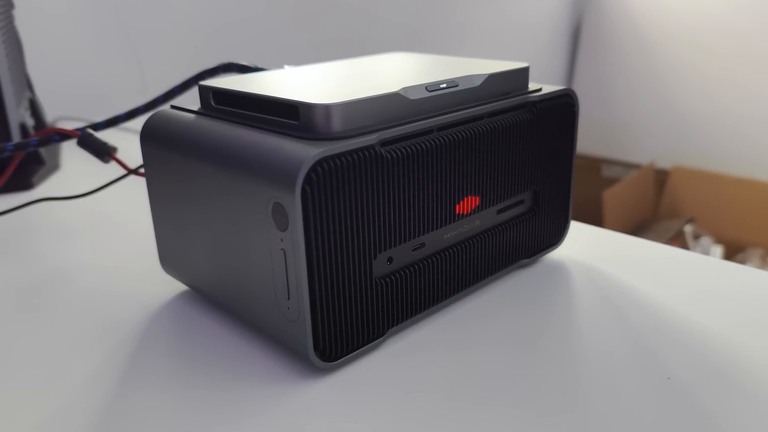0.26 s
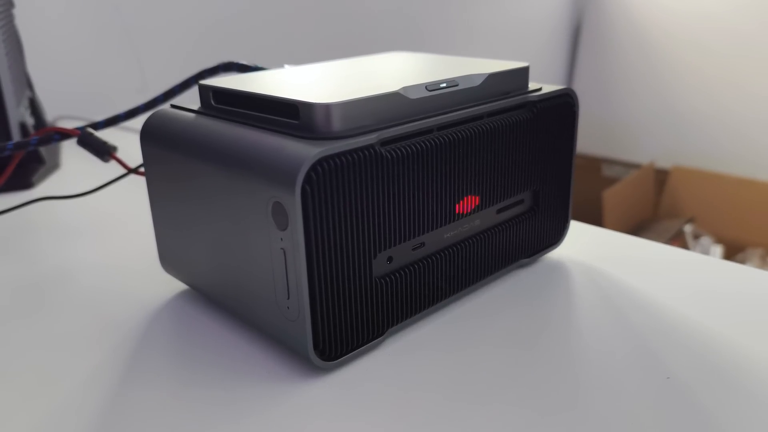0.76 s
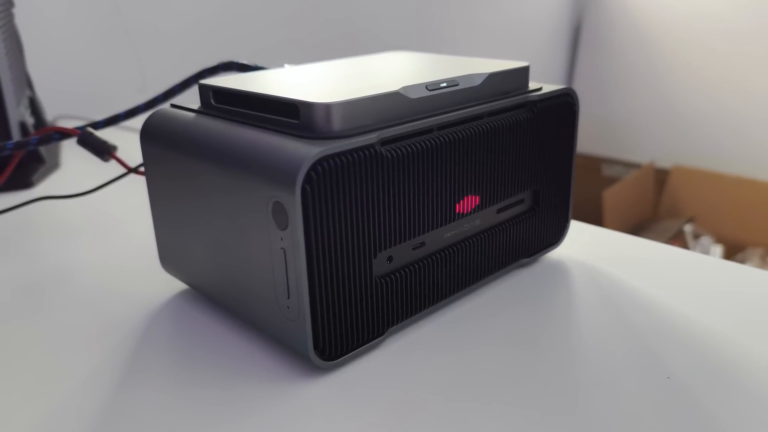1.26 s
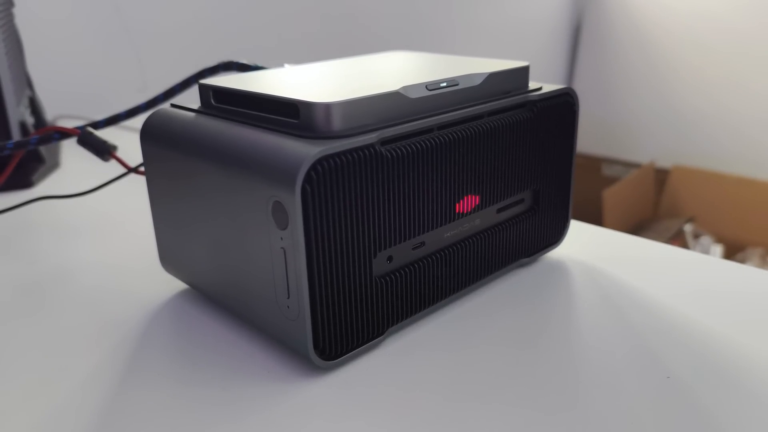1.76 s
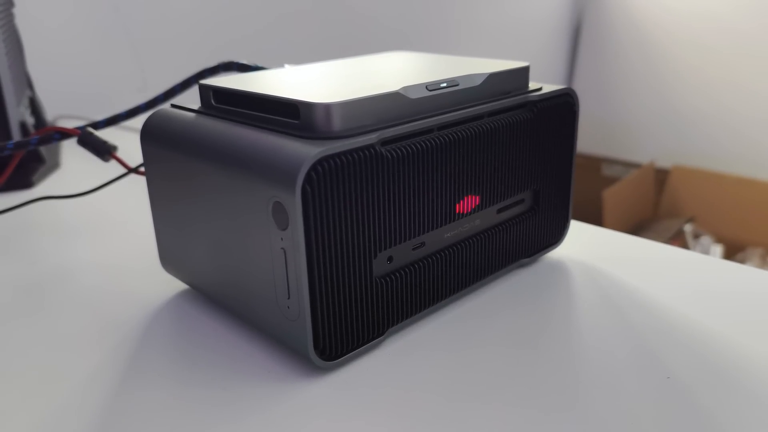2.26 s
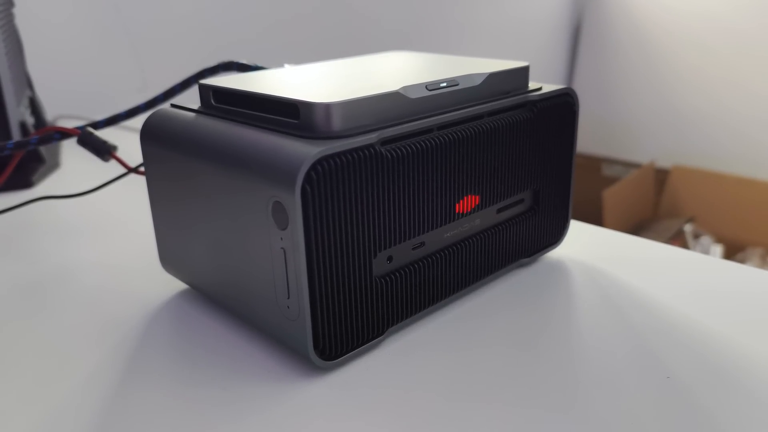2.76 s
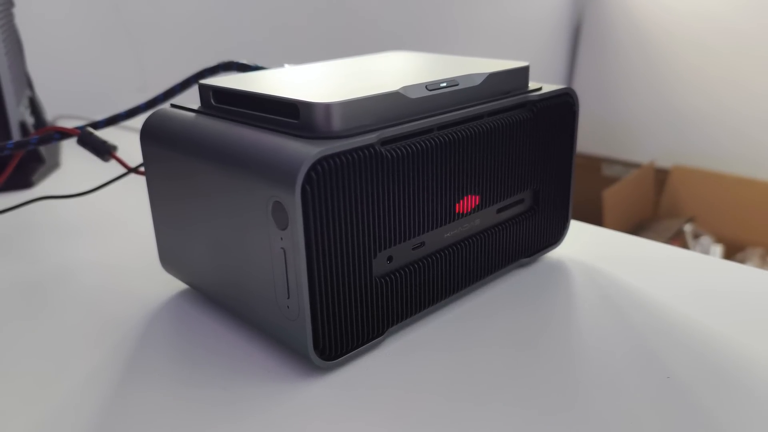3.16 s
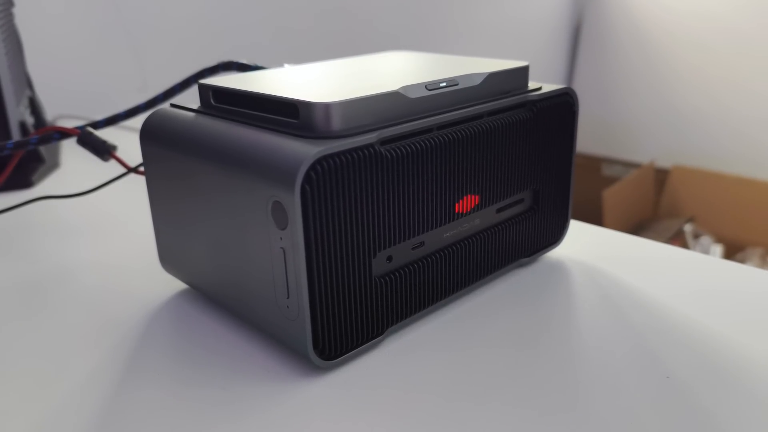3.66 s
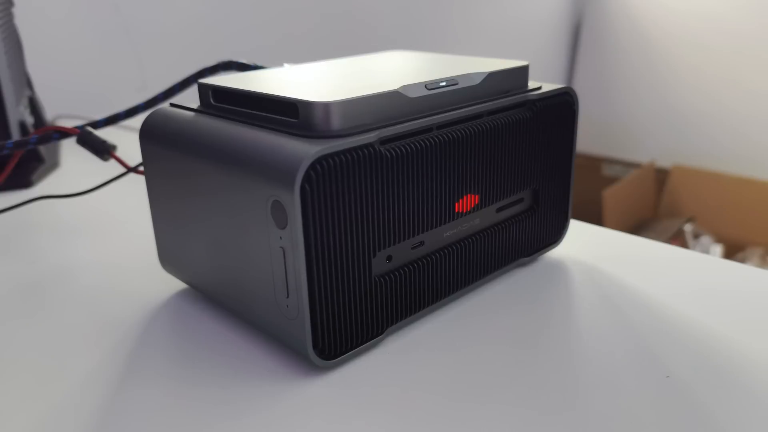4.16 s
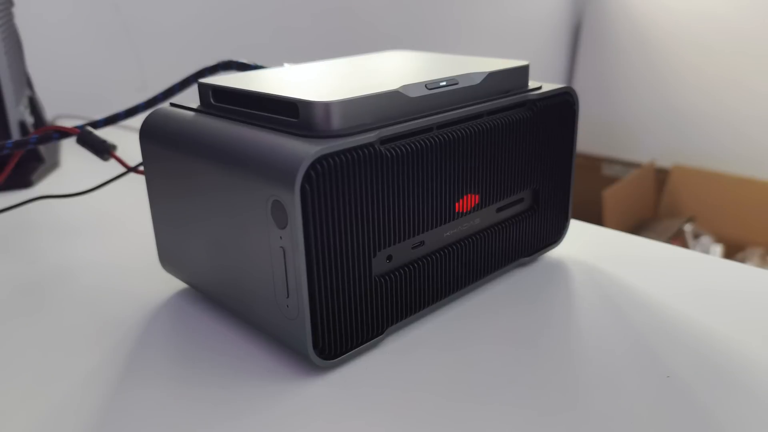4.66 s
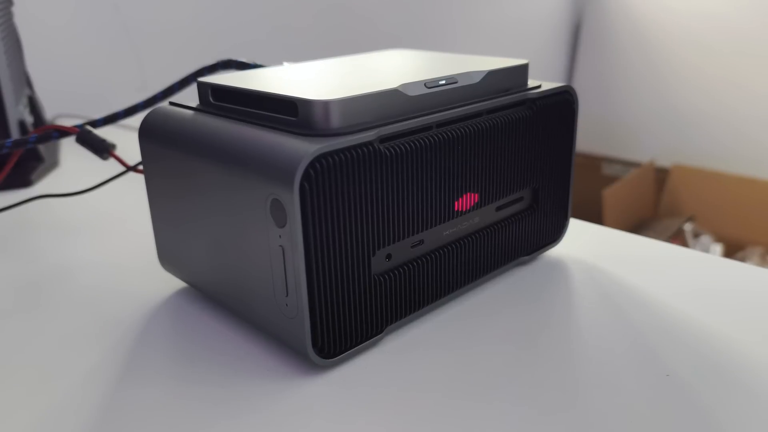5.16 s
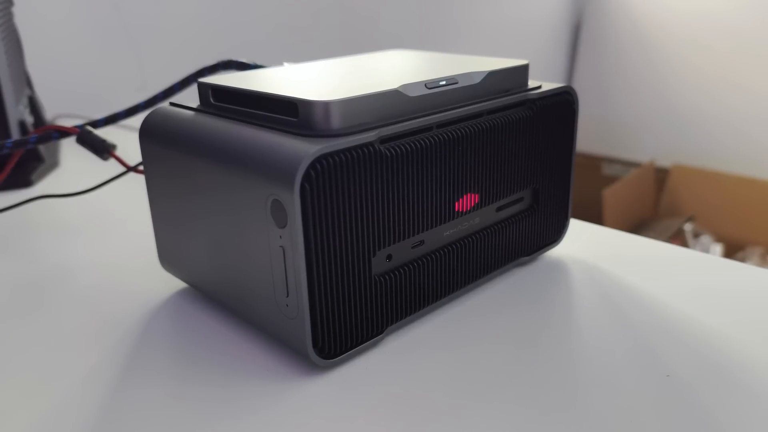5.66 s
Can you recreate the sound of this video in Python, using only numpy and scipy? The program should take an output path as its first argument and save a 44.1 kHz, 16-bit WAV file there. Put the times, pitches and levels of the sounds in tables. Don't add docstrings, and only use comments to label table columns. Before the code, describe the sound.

A small computer's cooling fan hisses steadily over a hollow low hum, close up, with a few dull bumps through the desk.

```python
import sys
import numpy as np
from scipy import signal
from scipy.fft import rfft, irfft
from scipy.io import wavfile
from scipy.ndimage import uniform_filter1d

SR = 44100
rng = np.random.default_rng(int(sys.argv[2]) if len(sys.argv) > 2 else 0)


def field_ratio(decibels):
    return 10 ** (np.asarray(decibels, dtype=float) / 20)


def store_wav(level_fs):
    pcm = np.round(np.clip(np.atleast_2d(level_fs), -1, 1) * 32767)
    wavfile.write(sys.argv[1], SR, pcm.T.astype(np.int16))


N = 260190

# pitch_hz, left and right density [dB per Hz]
CASE_AIR = [(20, -89, -98), (60, -87, -86), (131, -88.5, -93), (240, -90.5, -93), (332, -95, -97),
            (457, -91, -95.5), (625, -84, -87), (820, -83.5, -85), (1100, -83, -83), (1270, -85.5, -85.5),
            (1380, -93.5, -91), (1587, -84, -88.5), (1900, -91, -93.5), (2600, -100, -100)]
# pitch_hz, density [dB per Hz]
SLATS_LEFT = [(1700, -100), (2400, -88.5), (3400, -79.5), (4500, -77.5), (5500, -80.5), (7100, -86),
              (7600, -100), (8050, -107), (8500, -100), (9400, -107), (10400, -98), (11600, -86),
              (12200, -91.5), (13200, -112)]
SLATS_RIGHT = [(1700, -100), (2400, -91.5), (3700, -92.5), (4000, -89.5), (4600, -80.5), (5300, -90.5),
               (6500, -87), (7400, -82), (8300, -89.5), (9400, -95.5), (10300, -95.5), (10800, -93),
               (11400, -110), (13200, -113)]
# pitch_hz, width_hz, left_db, right_db
HOLLOWS = [(470, 27, 3.5, 1.5), (625, 56, 3.5, 2.5), (822, 40, 6, -3), (847, 30, -5.5, -2.5),
           (961, 62, 6, 7), (1004, 31, -9.5, -6.5), (1062, 58, 3, 4.5), (1182, 29, -4.5, -5.5),
           (1220, 27, 1.5, 0.5), (1894, 72, 3.5, -3.5), (2142, 43, 6.5, 6), (2571, 40, 8.5, 5),
           (2977, 64, 3.5, 7), (3350, 67, 3.5, 5.5), (3990, 127, 3, 9), (6200, 45, 3, 3),
           (1138, 38, 2.5, 3.5), (2280, 68, 0.5, 1), (2440, 46, 3, 0), (2730, 31, 3, 2),
           (4610, 140, 2.5, 2.5), (5080, 130, 0.5, 5), (6370, 72, 6, 0), (7360, 62, 9, 4.5),
           (8600, 170, 1, 5), (8050, 150, -8, -1), (9400, 330, -11, 1), (11200, 270, 1.5, -13),
           (11800, 200, -1, -6)]
# pitch_hz, likeness [0-1]
PORT_LIKENESS = [(30, 0.6), (120, 0.3), (330, 0.43), (600, 0.87), (1200, 0.78), (1400, 0.82), (1700, 0.7),
                 (2200, 0.17), (3000, 0.43), (4200, 0.87), (5500, 0.4), (7150, 0.78), (8000, 0.5),
                 (13000, 0.3)]
# pitch_hz, lead_rad
PORT_LEAD = [(30, -0.5), (850, 0.5), (1250, 1), (1600, 2.0), (2500, 1.3), (3300, 0.9), (4200, 0.77),
             (5000, -0.5), (5250, 4.5), (5900, 9.5), (6750, 10), (7450, 14.0), (8900, 18.5), (11500, 17)]
# multiple of shaft speed [count], left_db, right_db
SHAFT_ORDERS = [(1, -80, -84), (3, -64.5, -60.5), (5, -69, -75.5), (7, -93, -96), (10, -76.5, -77.5),
                (11, -86, -91)]
# height_s, level_db, rise_s, fall_s
SHOVES = [
    (.40, -61, .08, .08),
    (.68, -64, .06, .06),
    (1.27, -52, .06, .1),
    (2.45, -62, .1, 0.093),
    (2.7, -65, .1, .1),
    (2.92, -61, 0.091, .08),
    (4.12, -60, .06, .1),
    (5.05, -53, .09, .08),
    (5.27, -49, .09, 0.063),
]
# pitch_hz, width_hz, left_db, right_db
WHISTLES = [(201, 2.95, -78, -77), (805, 3.99, -73.5, -66), (934, 8.16, -78, -78), (1062, 8.06, -82, -84),
            (1203, 4.17, -70, -77), (1700, 5.88, -82.5, -70.5), (2550, 8.2, -90, -88),
            (4660, 14.6, -70, -79), (5340, 11, -79, -90), (6200, 8.5, -73, -79), (7200, 7.7, -79, -72),
            (13986, 5, -97, -84)]
# start_s, level_db, pitch_hz, t60_s
BUMPS = [
    (.525, -49, 110, 0.088),
    (.532, -52, 190, 0.05),
    (0.534, -48, 290, 0.049),
    (1.22, -56, 60, .2),
    (4.96, -52, 62, .15),
    (5.039, -50, 62, .12),
    (5.225, -51, 68.4, 0.25),
    (5.27, -47, 70, .15),
    (5.30, -56, 115, 0.092),
]
# pitch_hz, density [dB per Hz]
ROOM_RUMBLE = [(20, -98), (35, -89), (42, -74), (48, -81), (60, -86), (75, -87), (90, -88.5), (160, -104)]
# pitch_hz, density [dB per Hz]
SELF_NOISE = [(30, -105), (1000, -110), (9000, -113), (13000, -111), (14500, -111), (15800, -110.5)]
# pitch_hz, density [dB per Hz]
GATE_FLOOR = [(1000, -110), (2000, -101), (3000, -104), (6000, -110), (8000, -107), (12000, -109),
              (14000, -112), (15800, -112)]

SHAFT_HZ = 22.76
DESK_HZ = 42.8


def evened(x):
    return x / np.sqrt(np.mean(x ** 2) + 1e-20)


def read(points, hz):
    f, *columns = np.transpose(points)
    return np.array([np.interp(np.log(hz + 1), np.log(f + 1), c) for c in columns])


def drift(rate_hz, count=1):
    size, per_second = 512, 64
    hz = np.fft.rfftfreq(size, 1 / per_second)
    shape = (hz > 0) / (1 + (hz / rate_hz) ** 2)
    slow = evened(irfft(rfft(rng.standard_normal((count, size))) * shape, size))
    t, slow_t = np.arange(N) / SR, np.arange(size) / per_second
    return np.array([np.interp(t, slow_t, row) for row in slow])


def port_noise(db, same, lead):
    a, b = rfft(rng.standard_normal((2, N)))
    same = np.clip(same, 0, 1)
    left = a * np.exp(1j * lead)
    right = same * a + np.sqrt(1 - same ** 2) * b
    return irfft(np.array([left, right]) * field_ratio(db) * np.sqrt(SR / 2), N)


def eddies(x, patchy_db):
    z = signal.stft(x, nperseg=1024)[2]
    patches = uniform_filter1d(rng.standard_normal(z.shape[1:]), size=7, axis=0)
    patches = uniform_filter1d(patches, size=8, axis=1)
    patches -= uniform_filter1d(patches, size=60, axis=1)
    return signal.istft(z * field_ratio(patchy_db * evened(patches)), nperseg=1024)[1][:, :N]


def rush():
    hz = np.fft.rfftfreq(N, 1 / SR)
    case_top = CASE_AIR[-1][0]
    case_db = read(CASE_AIR, hz) - 60 * (hz > case_top) * np.log(hz / case_top + 1e-9)
    slats_db = np.vstack([read(SLATS_LEFT, hz), read(SLATS_RIGHT, hz)])
    slats_db -= 30 * abs(np.log((hz + 1) / np.clip(hz, SLATS_LEFT[0][0], SLATS_LEFT[-1][0])))
    hollow_db = 0
    for f, width_hz, left_db, right_db in HOLLOWS:
        hollow_db = hollow_db + np.outer([left_db, right_db], 1 / (1 + (2 * (hz - f) / width_hz) ** 2))
    same, lead = read(PORT_LIKENESS, hz)[0], read(PORT_LEAD, hz)[0]
    case = eddies(port_noise(case_db + hollow_db, same, lead), patchy_db=1.43)
    slats = eddies(port_noise(slats_db + hollow_db, same, lead), patchy_db=0.6)
    return case + slats * field_ratio(0.22 * drift(8.9))


def desk_echoes(x, echo_db=-13.0, t60_s=0.15):
    length, spacing = 4096, 24
    slots = np.arange(60, length, spacing)
    at = slots + rng.integers(0, spacing, (2, len(slots)))
    taps = np.zeros((2, length + spacing))
    signs = rng.choice([-1., 1.], at.shape)
    np.put_along_axis(taps, at, signs * field_ratio(-60 * at / SR / t60_s), 1)
    taps *= field_ratio(echo_db) / np.linalg.norm(taps, axis=1, keepdims=True)
    high = signal.sosfilt(signal.butter(2, 1400, "high", fs=SR, output="sos"), x)
    return x + signal.fftconvolve(high, taps, axes=1)[:, :N]


def rotor():
    turns = np.cumsum(SHAFT_HZ * (1 + 0.0015 * drift(0.59)[0])) / SR
    out = np.zeros((2, N))
    for order, left_db, right_db in SHAFT_ORDERS:
        level = field_ratio([[left_db], [right_db]] + 0.55 * drift(2.7))
        out += np.sqrt(2) * level * np.sin(2 * np.pi * (order * turns + rng.random()))
    return out


def thrum():
    t = np.arange(N) / SR
    turns = np.cumsum(2 * SHAFT_HZ * (1 + 0.00037 * drift(2.5)[0])) / SR
    tones = field_ratio(-56.5) * np.sin(2 * np.pi * turns)
    tones += field_ratio(-70) * np.sin(2 * np.pi * 54.49 * t)
    for height_s, level_db, rise_s, fall_s in SHOVES:
        since = t - height_s
        swell = np.exp(-(since / np.where(since < 0, rise_s, fall_s)) ** 2)
        sway_turns = turns - (2 * SHAFT_HZ - DESK_HZ) * since
        tones += field_ratio(level_db) * swell * np.sin(2 * np.pi * sway_turns)
    return np.sqrt(2) * field_ratio([[0.8], [-1.2]]) * tones


def whistles():
    out = np.zeros((2, N))
    for f, width_hz, left_db, right_db in WHISTLES:
        level = field_ratio([[left_db], [right_db]] + 1.8 * drift(6.0))
        turns = np.cumsum(f + width_hz * drift(4.12)[0]) / SR
        out += np.sqrt(2) * level * np.sin(2 * np.pi * (turns + rng.random()))
    return out


def bumps():
    out, t = np.zeros(N), np.arange(SR // 2) / SR
    for start_s, level_db, hz, t60_s in BUMPS:
        ring = np.sin(2 * np.pi * hz * t) + 0.43 * np.sin(2 * np.pi * 1.63 * hz * t)
        bump = field_ratio(level_db - 60 * t / t60_s) * (1 - np.exp(-t / 0.0035)) * ring
        part = out[round(start_s * SR):][:len(t)]
        part += bump[:len(part)]
    return out * field_ratio([[1.0], [-1.0]])


def rumble():
    hz = np.fft.rfftfreq(N, 1 / SR)
    fall_db = 40 * np.log(np.maximum(hz / ROOM_RUMBLE[-1][0], 1))
    return port_noise(read(ROOM_RUMBLE, hz) - fall_db, 0.65, 0)


def self_noise():
    return port_noise(read(SELF_NOISE, np.fft.rfftfreq(N, 1 / SR)), 0, 0)


def gate(x, wander_db=1.5):
    lead_in = 348
    window = np.sin(np.pi * (np.arange(2048) + 0.5) / 2048)
    frames = dict(fs=SR, window=window, nperseg=2048, noverlap=1024, scaling="psd")
    hz, t, z = signal.stft(np.pad(x, ((0, 0), (lead_in, 0))), **frames)
    power = uniform_filter1d(abs(z) ** 2, size=9, axis=1)
    power = uniform_filter1d(power, size=2, axis=2)
    wander = evened(uniform_filter1d(rng.standard_normal(len(t)), size=2))
    floor_db = read(GATE_FLOOR, hz).T + wander_db * wander
    z = z * (10 * np.log10(2 * power + 1e-20) > floor_db)
    return signal.istft(z, **frames)[1][:, lead_in:lead_in + N]


def scene():
    return desk_echoes(rush()) + rotor() + thrum() + whistles() + bumps() + rumble()


def roll_off(x):
    return signal.sosfilt(signal.butter(12, 15670, fs=SR, output="sos"), x)


def record(dry):
    mix = gate(dry + self_noise())
    return roll_off(mix)


dry = scene()
out = record(dry)
store_wav(out)
```